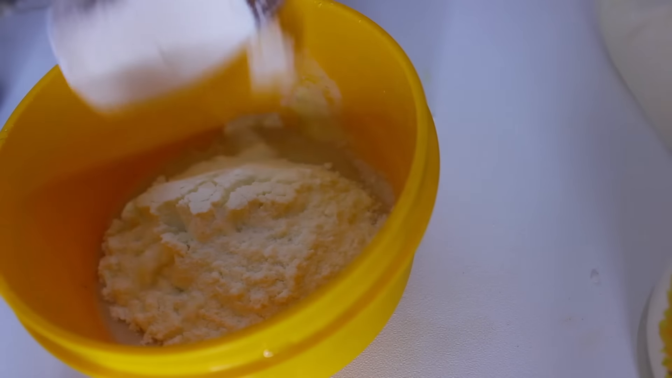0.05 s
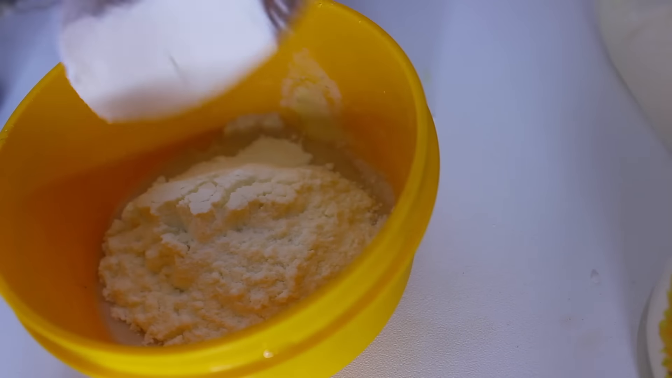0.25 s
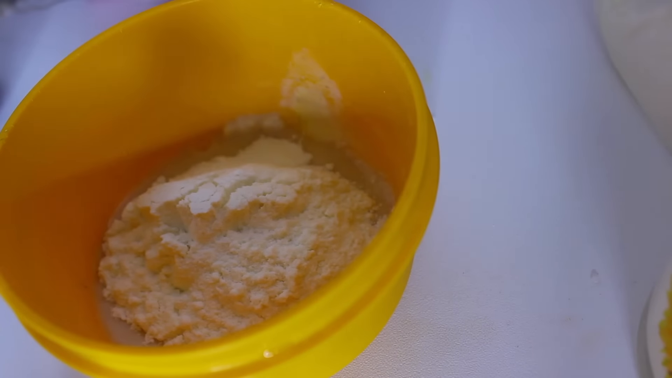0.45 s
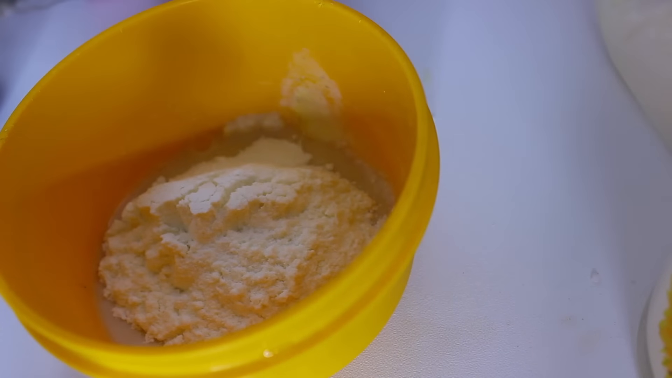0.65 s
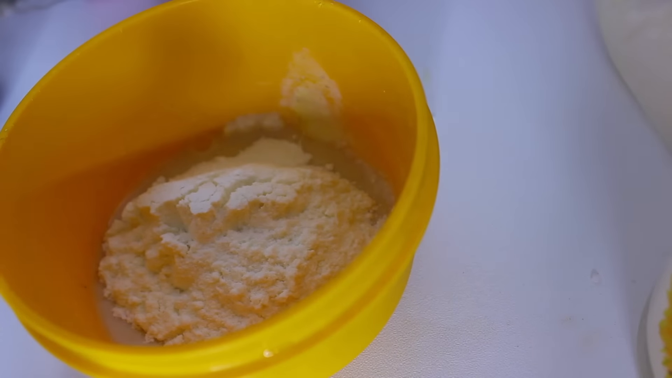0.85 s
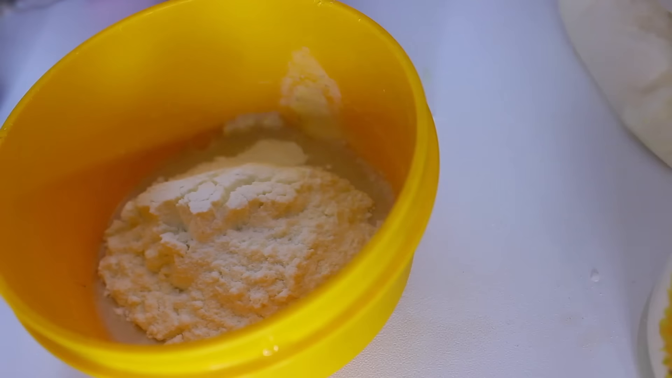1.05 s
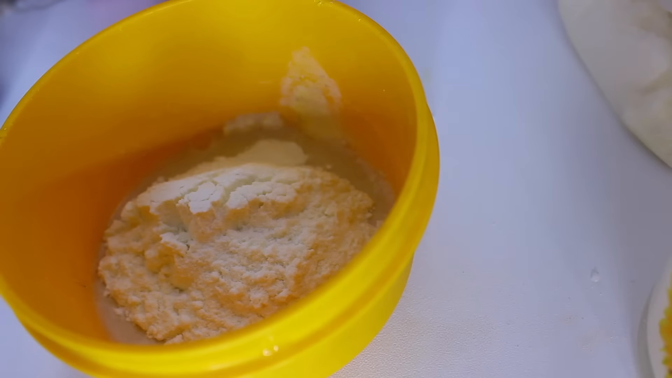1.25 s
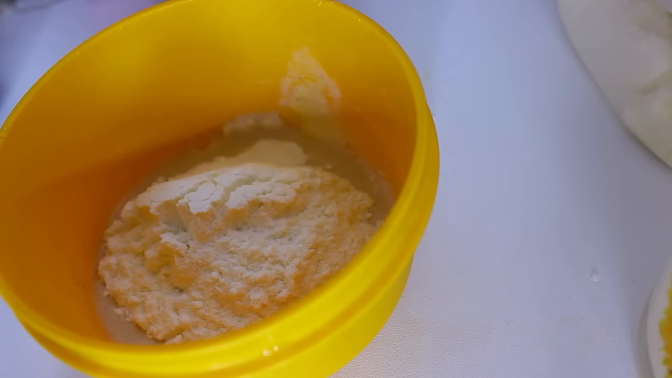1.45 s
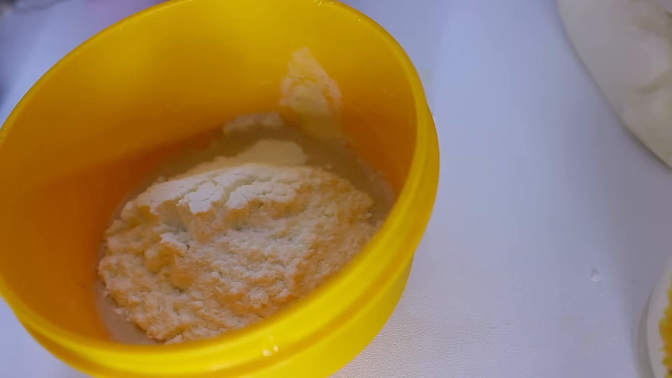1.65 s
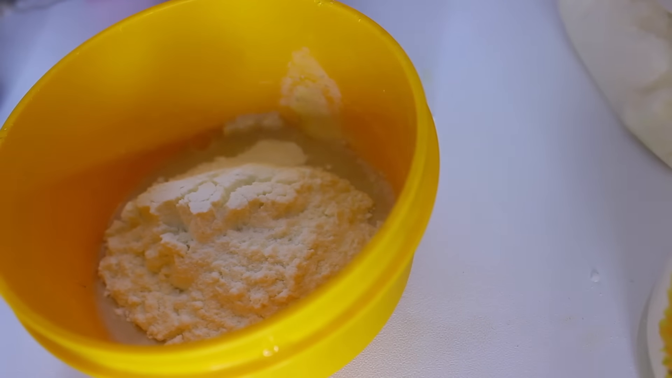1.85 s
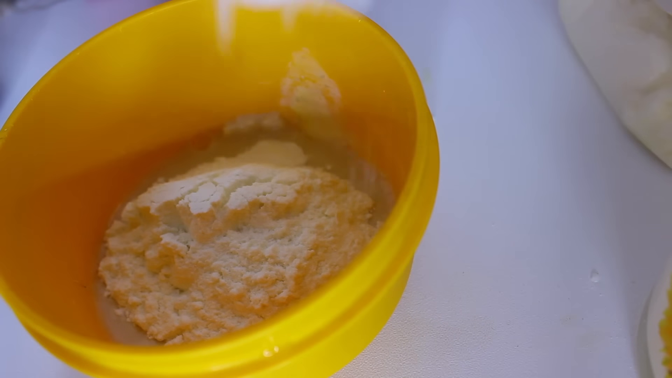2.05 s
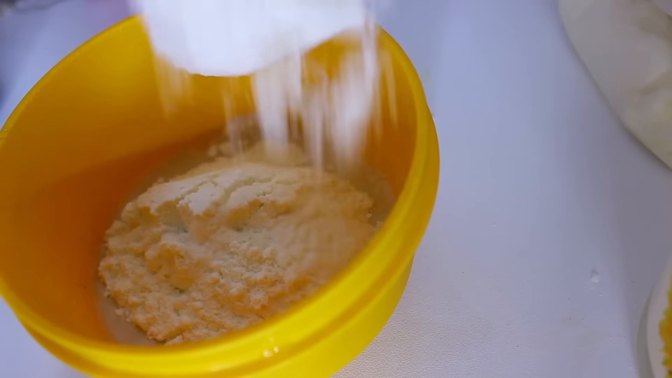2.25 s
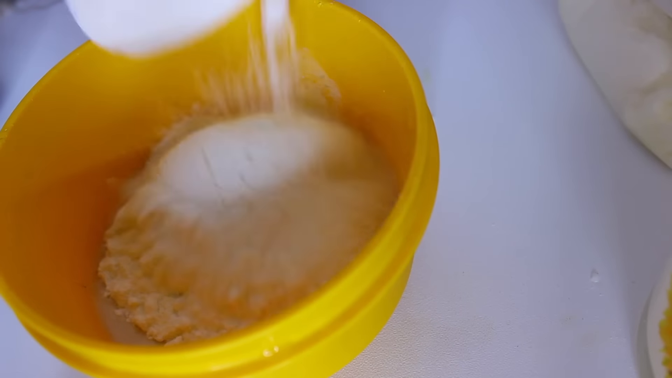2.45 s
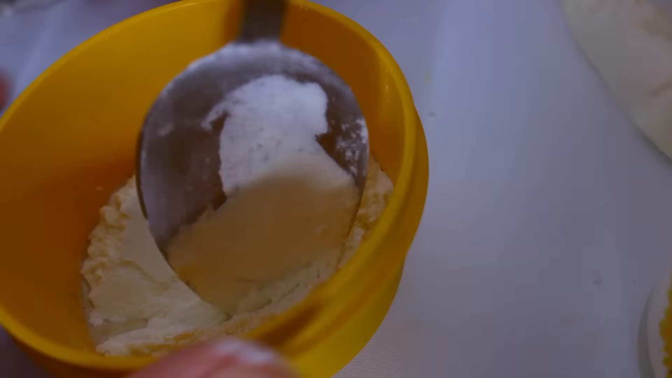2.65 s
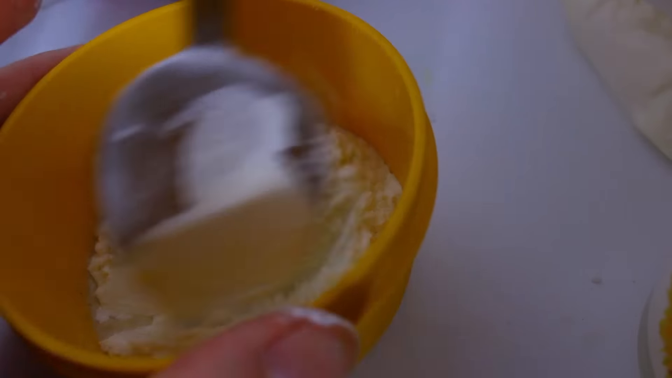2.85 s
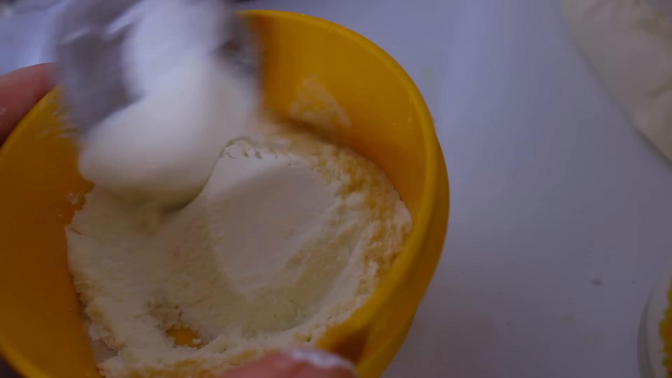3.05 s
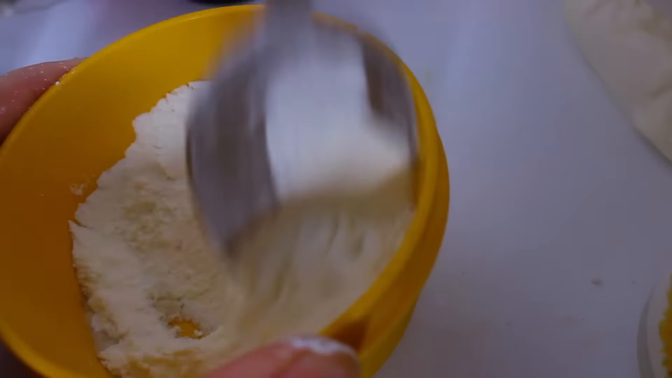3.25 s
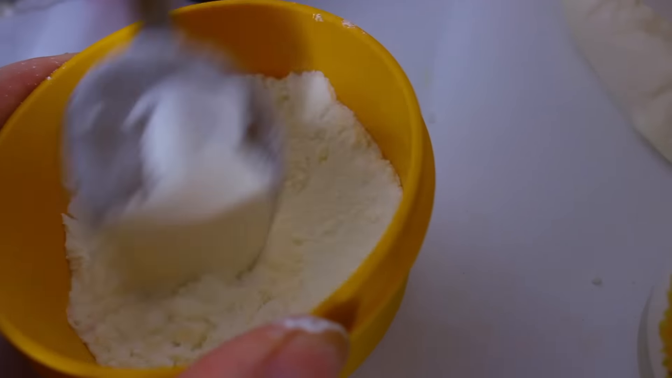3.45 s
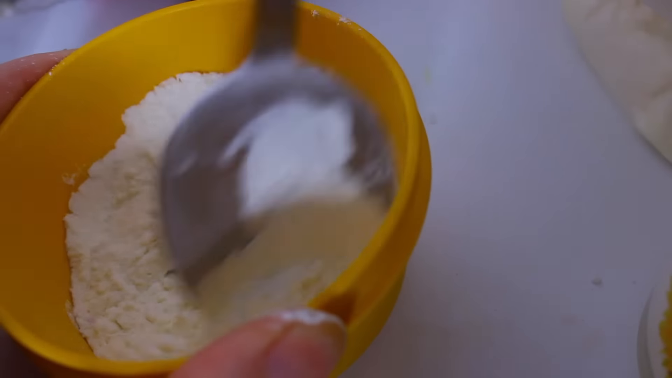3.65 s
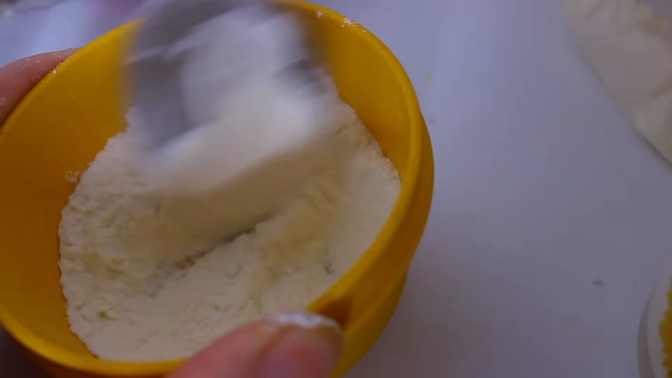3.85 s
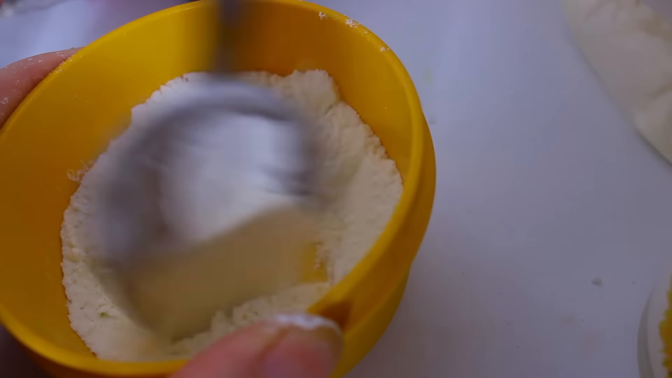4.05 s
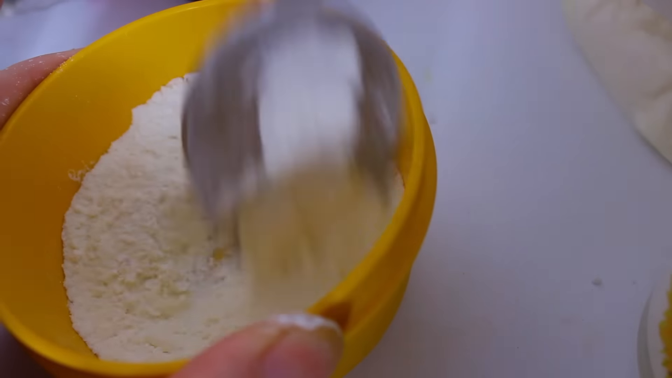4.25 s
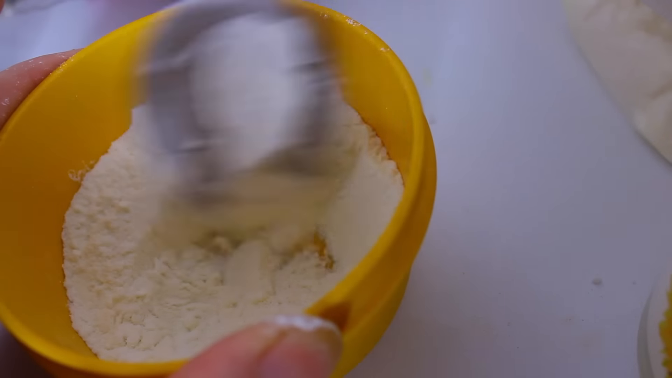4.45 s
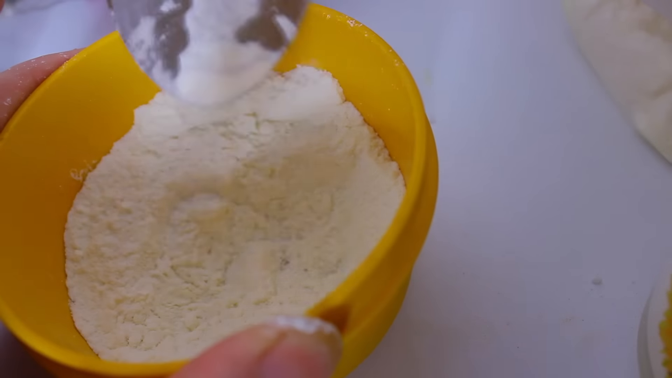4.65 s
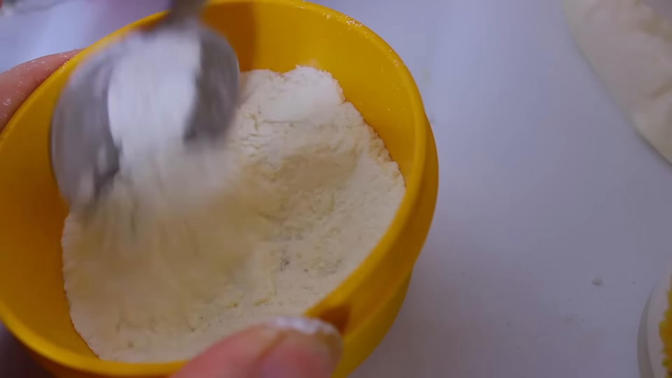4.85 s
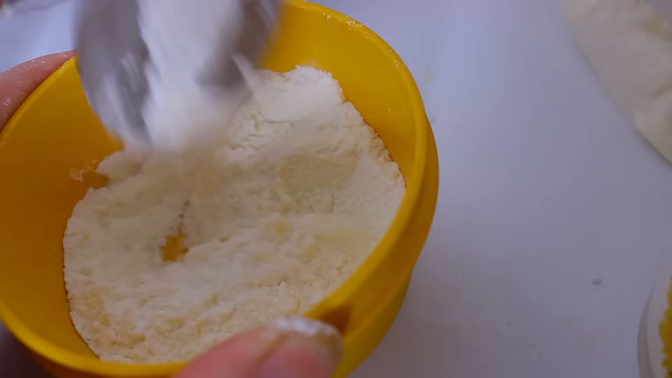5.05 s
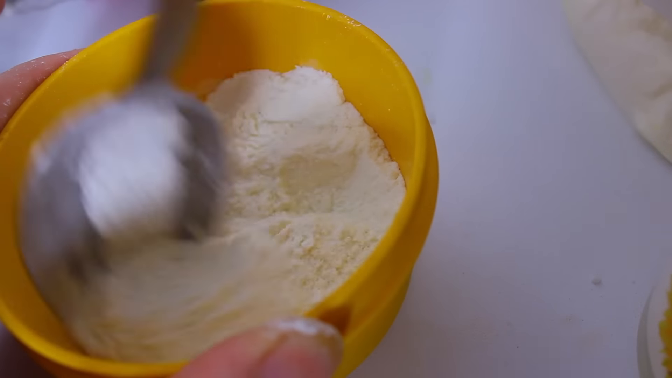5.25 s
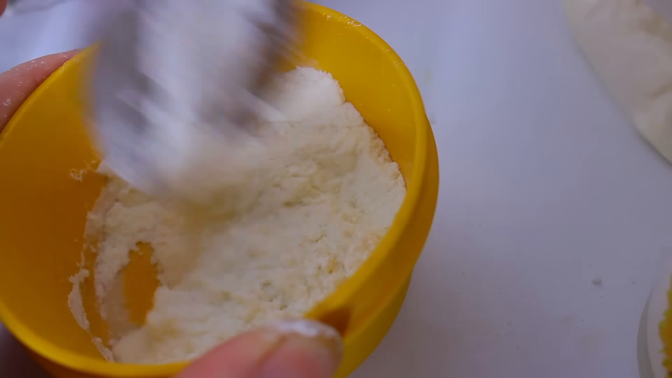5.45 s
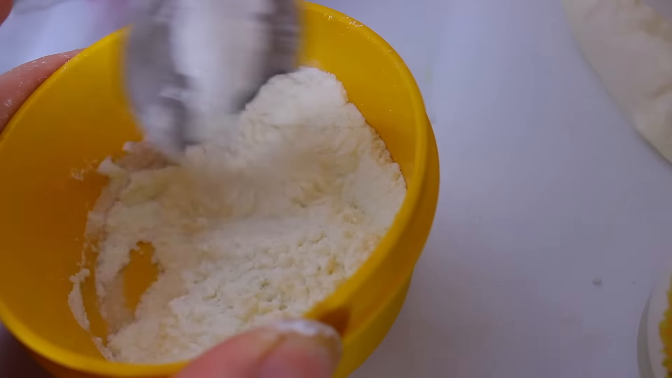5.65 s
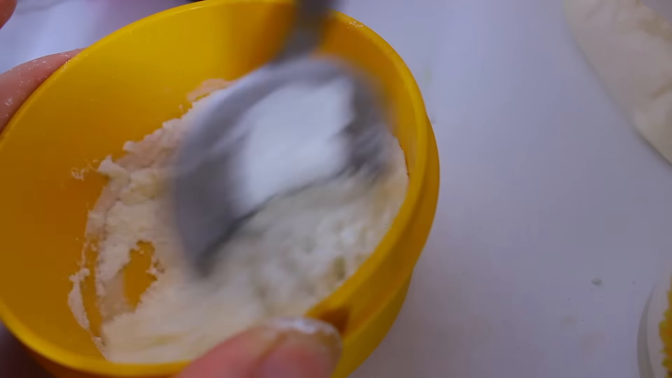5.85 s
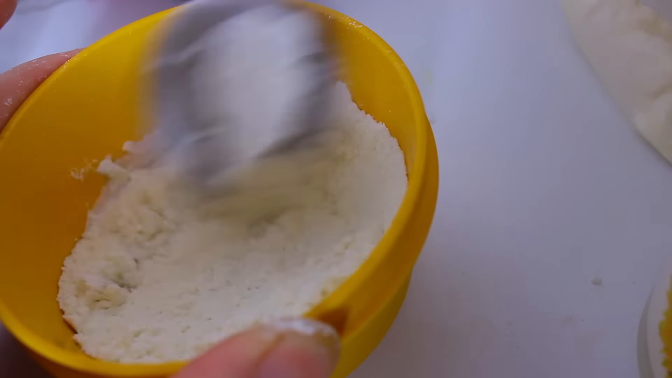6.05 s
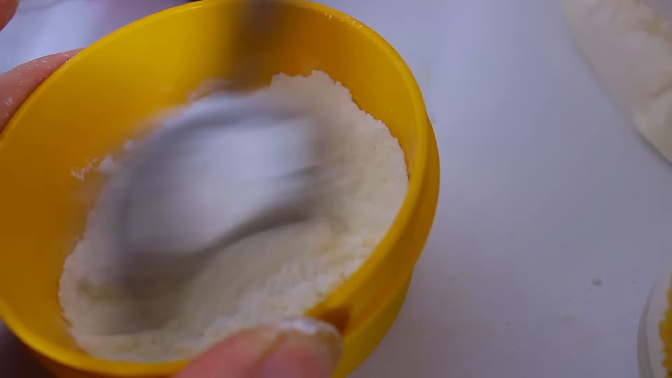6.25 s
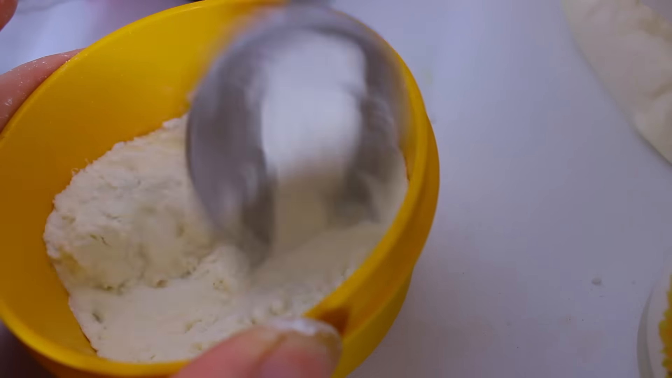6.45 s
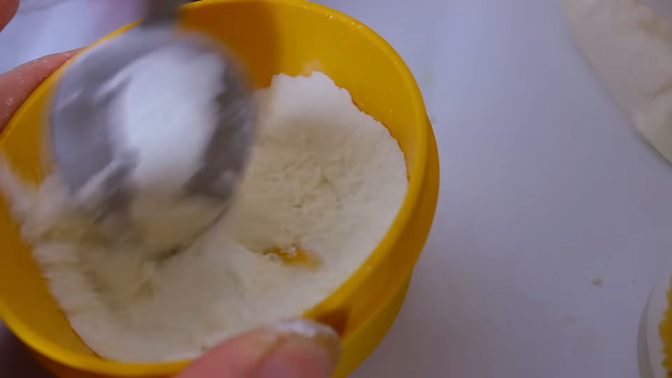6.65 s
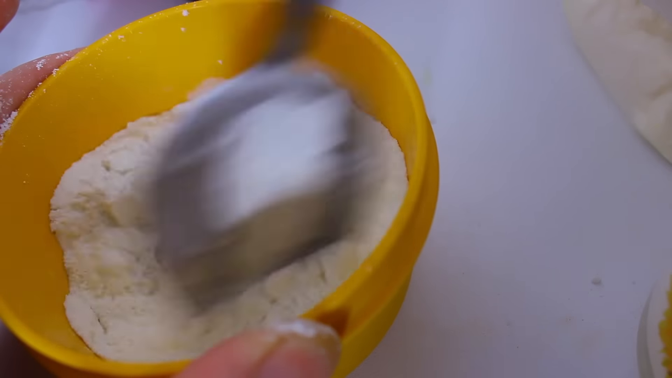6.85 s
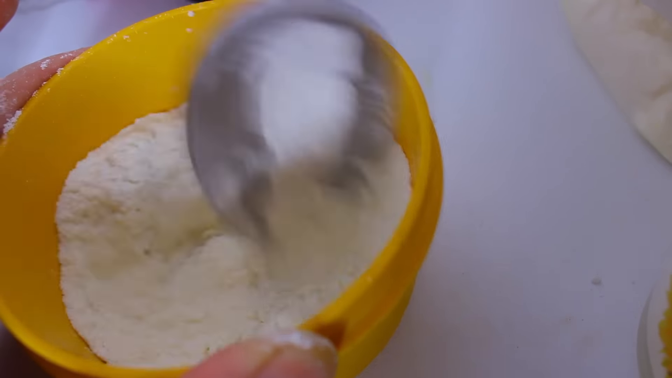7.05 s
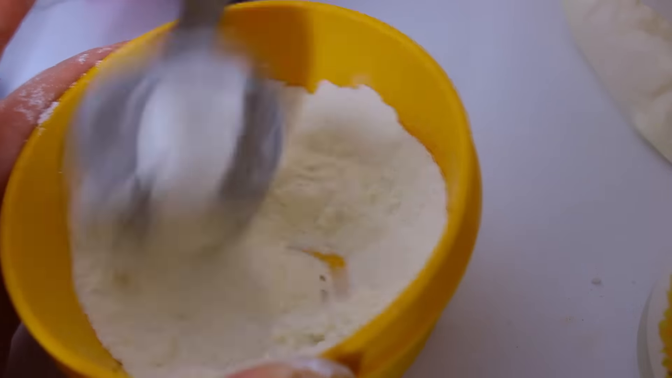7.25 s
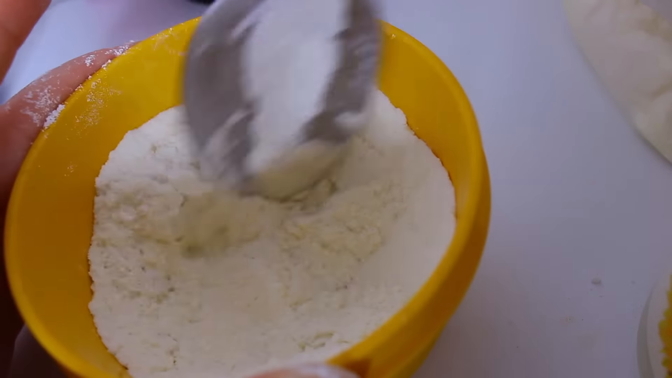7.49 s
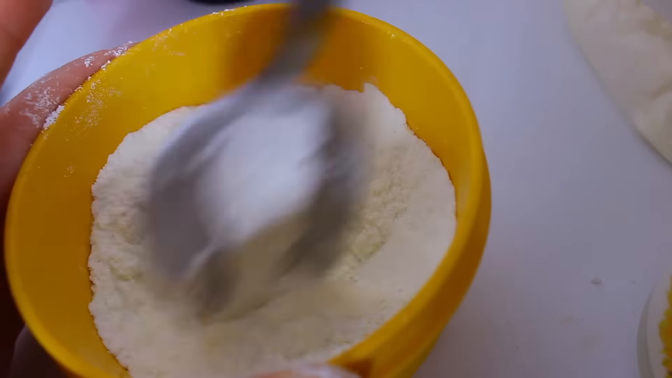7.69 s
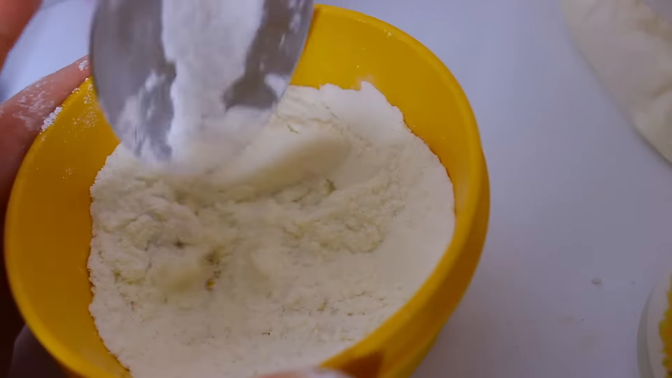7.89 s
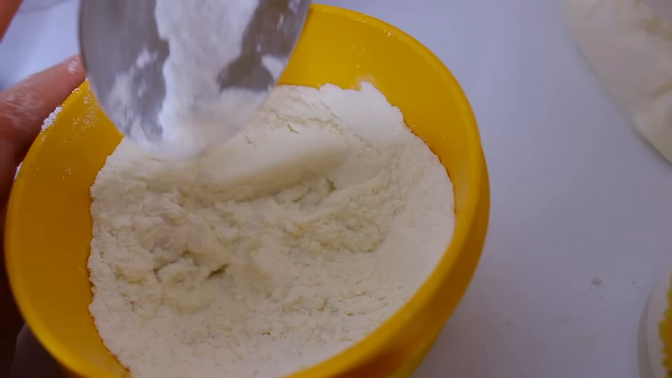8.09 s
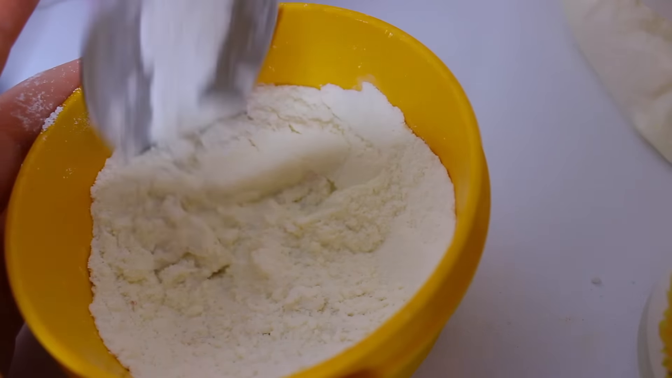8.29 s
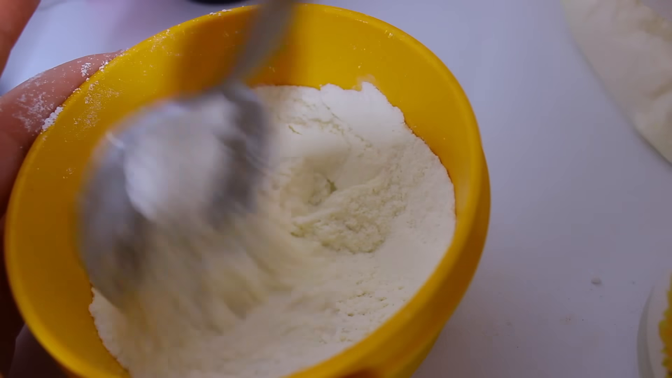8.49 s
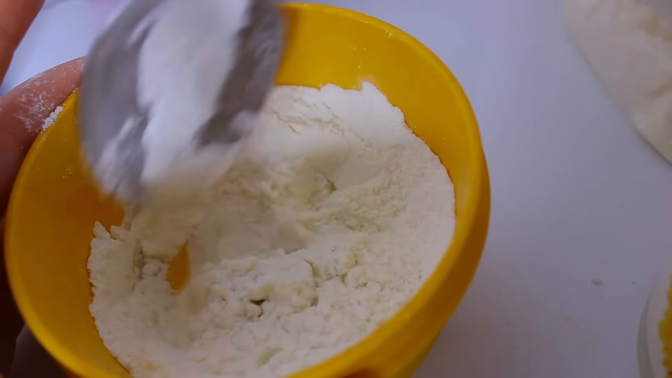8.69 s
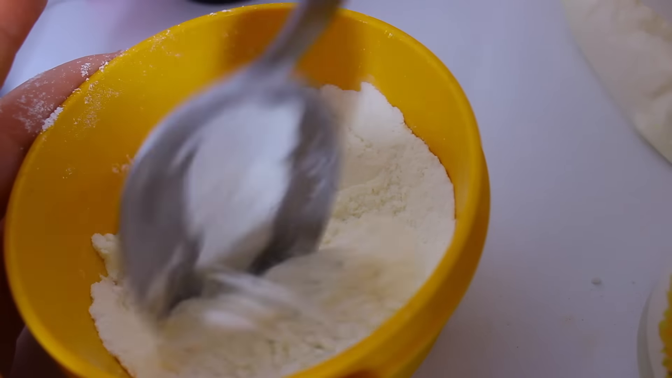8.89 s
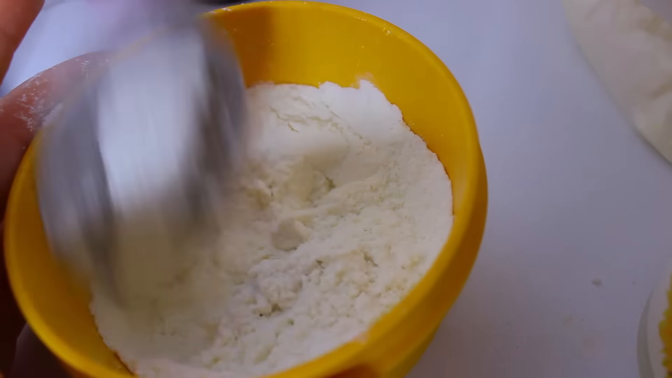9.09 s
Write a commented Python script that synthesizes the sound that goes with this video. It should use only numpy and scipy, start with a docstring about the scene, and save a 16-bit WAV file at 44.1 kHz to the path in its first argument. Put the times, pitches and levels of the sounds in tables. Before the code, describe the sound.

After a few light taps, a metal spoon knocks and scrapes around a plastic bowl of flour, close up in a kitchen.

```python
"""Stirring flour in a plastic bowl

After some quiet handling, a steel spoon stirs dry flour in a small hand-held bowl, close up.
It knocks on the wall and bottom, drags gritty powder along the plastic, catches and slips,
and the steel rings faintly along. The kitchen adds a short tail, over soft hiss and mains hum."""
import sys
import numpy as np
from scipy import signal
from scipy.fft import rfft, irfft, next_fast_len
from scipy.io import wavfile

SR = 44100
rng = np.random.default_rng(int(sys.argv[2]) if len(sys.argv) > 2 else 0)


def put_to_file(sound):
    """Save the sound as 16-bit audio at rate SR, in the file named by the first command-line argument."""
    columns = np.atleast_2d(sound).T  # one column per channel
    safe = np.clip(columns, -1, 1)
    whole_steps = np.round(safe * 32767)
    wavfile.write(sys.argv[1], SR, whole_steps.astype(np.int16))


N = 402633
TIME = np.arange(N) / SR

# knocks on the bowl, spoon blows and a few faint handling ticks: start_s, mid_db, treble_db (relative to mid),
# focus_hz (favoured pitch)
KNOCK_CUES = [(1.154, -47.5, -8, 746), (1.176, -61, 4, 1400), (1.2347, -48.5, -9.5, 910),
              (1.363, -42.5, 5, 1120), (1.855, -38, -38, 910), (2.406, -52.5, -9, 1200),
              (2.5397, -53.5, -2, 700), (3.1157, -36, 3.5, 1370), (3.1266, -46, -1, 1820),
              (3.2349, -33, -12.5, 490), (3.24, -21.5, -35, 930), (3.381, -41.5, -13, 630),
              (3.5575, -40.5, -28, 1600), (3.67, -22, -12.5, 1550), (4.0047, -22, -10, 1700),
              (4.3102, -21.5, -9, 1770), (4.5953, -20.5, -6, 1180), (4.7673, -35, -13, 625),
              (4.9073, -35, -18, 577), (5.2647, -28.5, -11.5, 416), (5.768, -33.5, -26, 1400),
              (6.188, -21, -6, 1350), (6.394, -29.5, -3.5, 850), (6.564, -21, -2, 1600),
              (7.0649, -31.5, -8, 2350), (7.1691, -26.5, -3.5, 1300), (7.4818, -22.5, -5, 1490),
              (7.718, -35, -13, 3000), (7.72, -43, -1, 270), (7.7341, -40.5, -9, 1300),
              (8.47, -50, -15, 800), (8.8624, -28, -4.5, 373)]


def undb(db):
    """Decibels to gain."""
    return 10 ** (np.asarray(db) / 20)


def unit(x):
    """Scale to rms 1."""
    return x / np.sqrt(np.mean(x ** 2))


def at_hz(points, hz):
    """Read (freq_hz, value) points on a log-frequency axis."""
    freq_hz, value = np.transpose(points)
    return np.interp(np.log(np.maximum(hz, 1)), np.log(freq_hz), value)


def colour(x, points):
    """EQ a sound with a (freq_hz, gain_db) curve."""
    size = next_fast_len(len(x))
    gain = undb(at_hz(points, np.fft.rfftfreq(size, 1 / SR)))
    return irfft(rfft(x, size) * gain, size)[:len(x)]


def band(x, lo_hz, hi_hz, order=2):
    """Causal band-pass."""
    sos = signal.butter(order, [lo_hz, min(hi_hz, SR / 2 - 1)], "band", fs=SR, output="sos")
    return signal.sosfilt(sos, x)


def wander(rate_hz):
    """Smooth random modulation, rms 1."""
    knots = rng.standard_normal(int(N / SR * rate_hz) + 2)
    return unit(np.interp(TIME * rate_hz, np.arange(len(knots)), knots))


def brighten(x, bright_db):
    """Balance the treble against the body below 5 kHz, at roughly constant power."""
    low, high = unit(band(x, 150, 5000)), unit(band(x, 5000, 19000))
    return (low - undb(bright_db) * high) / np.sqrt(1 + undb(2 * bright_db))


def room_tone():
    """Steady hiss, thin in the bass, with a faint rumble and a slightly wavering hum."""
    # tone of the hiss: freq_hz, gain_db
    hiss_eq = [(76, -32), (130, -9), (202, -6.5), (321, -12.5), (355, -8.5), (480, -7.5), (988, -9.5),
               (2210, -14), (2640, -11.5), (3570, -13), (15800, -22)]
    # hum lines: pitch_hz, level_db
    hum_lines = [(43, -81.5), (101, -72.5)]
    hiss = undb(-58.5) * unit(colour(rng.standard_normal(N), hiss_eq))
    rumble = undb(-73.5) * unit(band(rng.standard_normal(N), 67, 157))
    rumble += undb(-78.0) * unit(band(rng.standard_normal(N), 35, 38))
    waver = undb(1.2 * wander(5))
    hum = sum(undb(db) * np.sqrt(2) * np.sin(2 * np.pi * hz * TIME + 0.32 * wander(6))
              for hz, db in hum_lines)
    return hiss + rumble + waver * hum


def kitchen_tail(x, wet_db, gap_s):
    """A diffuse tail that builds after the first wall is reached and dies sooner in the treble."""
    # tone of the tail, with two low room resonances: freq_hz, gain_db
    tail_eq = [(80, -1), (170, 1.5), (197, 8), (220, 5.5), (246, 8), (280, -2.5), (420, -2), (600, -1.5),
               (1200, -5.5), (2500, -16.5), (5000, -8.5), (9000, -13), (15000, -14)]
    # decay of the room: freq_hz, t60_s
    decay_times = [(100, 0.68), (260, 0.41), (700, 0.59), (1800, 0.56), (5000, 0.43), (14000, 0.1)]
    t = np.arange(SR * 3 // 4) / SR
    edges_hz = np.geomspace(70, 17000, 13)
    tail = 0
    for lo, hi in zip(edges_hz, edges_hz[1:]):
        fade = np.exp(-np.log(1000) * t / at_hz(decay_times, np.sqrt(lo * hi)))
        tail = tail + band(rng.standard_normal(len(t)), lo, hi) * fade
    tail = colour(tail, tail_eq) * np.clip(t / gap_s - 1, 0, 1)
    return undb(wet_db) * signal.fftconvolve(x, tail)[:N] / np.sqrt(SR * .03)


def spoon_ring(x):
    """Every knock and scrape also feeds the narrow resonances of the steel."""
    # modes of the spoon: pitch_hz, t60_s, peak_gain_db
    steel_modes = [(1091, 0.37, 0.5), (1220, 0.67, -28), (1820, 1.6, -0.5), (4000, 1.2, 7), (7740, .6, -14)]
    t = np.arange(SR) / SR
    response = 0
    for hz, t60_s, db in steel_modes:
        decay = np.log(1000) / t60_s
        envelope = undb(db) * 2 * decay / SR * np.exp(-decay * t)
        response = response + envelope * np.sin(2 * np.pi * hz * t)
    return signal.fftconvolve(x, response)[:N]


def grit(per_s, spread_db):
    """Tiny clicks of powder grains giving way, unequal in size."""
    hit = rng.random(N) < per_s / SR
    return unit(hit * rng.standard_normal(N) * undb(spread_db * rng.standard_normal(N)))


def friction(judder_db, swell_db):
    """Grains stick and slip between spoon and wall; each resonance swells as the contact moves."""
    # resonances of the spoon's edge rubbing the wall: centre_hz, width_hz, gain_db
    rub_bands = [(1350, 410, 6.5), (1600, 112, 5), (2270, 340, 8.5), (2798, 390, 5.5), (3135, 650, 1.5),
                 (3835, 590, 2.5), (4160, 145, 0.5), (4435, 580, -1.5), (5300, 650, -4.5),
                 (6050, 460, -4.5), (7050, 1100, -9.5), (8700, 660, -11), (10270, 600, -12.5),
                 (12000, 2400, -18), (14700, 1900, -39)]
    force = grit(per_s=7900, spread_db=5.0) * undb(judder_db * wander(260))
    rasp = 0
    for hz, width, db in rub_bands:
        gain = undb(db + swell_db * wander(45))
        rasp = rasp + gain * band(force, max(hz - width / 2, 50), hz + width / 2)
    return unit(rasp)


def skids():
    """After each knock the spoon skids on through the flour, the louder the harder it struck."""
    lag_s, swell_s, fade_s, bright_db = 0.035, .025, 0.057, -15.5
    hard_knock_db, hard_skid_db = -21.5, -44
    return [(start_s + lag_s, swell_s, fade_s, hard_skid_db + 1.06 * (mid_db - hard_knock_db), bright_db)
            for start_s, mid_db, *_ in KNOCK_CUES]


def stir_envelopes():
    """Level and brightness in dB: each stroke swells and fades over the rustle of loose flour."""
    # loose flour shifting between the sweeps: time_s, level_db
    rustle_levels = [(0, -58), (.8, -60.5), (1.8, -61), (2.0, -58.5), (2.62, -58.5), (2.67, -53),
                     (3.5, -56.5), (4.0, -55), (5.0, -56), (5.55, -58.5), (5.9, -53), (7.6, -59),
                     (7.95, -61.5), (8.7, -60), (8.9, -53.5), (9.12, -57.5)]
    # sweeps of the spoon through the powder: peak_s, swell_s, fade_s, level_db, bright_db
    strokes = [(1.36, 0.011, .012, -47, -8), (2.09, .13, 0.072, -55.5, 1), (3.06, 0.052, 0.054, -45, -35),
               (3.36, 0.023, .025, -45.5, 2), (3.49, 0.082, .03, -49, -13), (3.735, .02, 0.018, -44.5, -2),
               (4.95, .012, 0.02, -48.5, -5), (5.26, 0.047, .06, -48.5, 2), (5.32, .02, 0.02, -40, -2.5),
               (5.67, 0.024, 0.024, -52.5, 12), (5.755, 0.019, 0.032, -42.5, 1),
               (5.89, 0.053, 0.038, -40, -4.5), (6.085, 0.055, 0.021, -42, -12),
               (6.26, 0.019, 0.02, -44.5, -3), (6.45, 0.012, 0.014, -40, -9),
               (6.49, 0.0072, 0.01, -32.5, -5), (6.54, 0.019, 0.021, -34.5, -10),
               (6.77, 0.013, 0.011, -44, -9), (6.888, 0.03, 0.022, -34.5, -1),
               (6.96, .03, 0.016, -45.5, 10), (7.147, .006, 0.022, -33.5, -5),
               (7.36, 0.17, .035, -47.5, -13.5), (7.72, 0.058, .04, -41, -3.5),
               (8.585, 0.062, 0.035, -45.5, 0.5), (8.92, 0.0099, 0.011, -43.5, 8)]
    rustle_bright_db = -1.5
    rustle_db = np.interp(TIME, *np.transpose(rustle_levels)) + wander(12)
    rustle_power = undb(2 * rustle_db)
    low = rustle_power / (1 + undb(2 * rustle_bright_db))
    high = rustle_power - low
    for peak_s, swell_s, fade_s, db, bright_db in strokes + skids():
        span = slice(*np.searchsorted(TIME, [peak_s - 3 * swell_s, peak_s + 3 * fade_s]))
        t = TIME[span] - peak_s
        bell_curve = np.exp(-.5 * (t / np.where(t < 0, swell_s, fade_s)) ** 2)
        power = (undb(db) * bell_curve) ** 2
        dull_share = 1 / (1 + undb(2 * bright_db))
        low[span] += power * dull_share
        high[span] += power * (1 - dull_share)
    return 10 * np.log10(low + high), 10 * np.log10(high / low)


def stirring(touch_db):
    """Light strokes only shift powder, a smooth hiss; above touch_db the spoon rasps on the wall."""
    # tone of flour sliding over itself: freq_hz, gain_db
    powder_eq = [(100, -6), (200, 3), (450, -0.5), (900, 4), (1800, 4), (3000, -2), (5000, -9),
                 (9000, -14.5), (16000, -12.5)]
    level_db, bright_db = stir_envelopes()
    contact = 1 / (1 + undb(2 * (touch_db - level_db)))
    rasp = brighten(friction(judder_db=2.4, swell_db=4), bright_db)
    powder = brighten(colour(grit(per_s=16000, spread_db=1.5), powder_eq), bright_db)
    return undb(level_db) * (np.sqrt(contact) * rasp + np.sqrt(1 - contact) * powder)


def slips():
    """The spoon's edge catches on the wall and lets go in a few milliseconds of friction."""
    # slips of the edge: peak_s, level_db
    slip_cues = [(3.55, -33), (5.307, -31.5), (5.329, -38), (5.766, -25.5), (5.799, -26.5), (5.918, -34),
                 (6.036, -36), (6.188, -20), (6.434, -23), (6.454, -29.5), (6.467, -29), (6.492, -26.5),
                 (6.529, -25), (6.553, -24.5), (6.839, -37), (7.137, -26.5), (7.158, -26), (7.21, -20.5),
                 (7.625, -35.5)]
    bursts = np.zeros(N)
    for peak_s, db in slip_cues:
        span = slice(int((peak_s - .02) * SR), int((peak_s + .02) * SR))
        bursts[span] += undb(db) * np.exp(-((TIME[span] - peak_s) / 0.003) ** 2)
    return bursts * friction(judder_db=5.5, swell_db=1.3)


def struck_modes(focus_hz, falloff_db_per_octave, scatter_db, detune):
    """The bowl's modes for one point of contact: weaker away from focus_hz, all varying a little."""
    # the plastic bowl, damped by flour and hand: pitch_hz, width_hz, gain_db
    bowl_modes = [(181, 41, -16), (242, 17, -8.5), (292, 59, -1), (371.5, 14, 0.5), (430, 43, -3.5),
                  (556.6, 60, -4.5), (664, 84, -4.5), (799, 12.3, -3.5), (897, 29, -4), (1058, 113, -6),
                  (1170, 92, -1), (1426, 225, -3.5), (1753, 85, 1), (2116, 113, -1.5), (2376, 130, 1),
                  (2810, 66, -1), (3163, 180, 6.5), (3810, 250, -27), (4380, 190, -11), (4760, 180, -11.5),
                  (5290, 620, -7.5), (6360, 150, -24), (7560, 180, -31), (8900, 260, -14), (9600, 240, -40),
                  (12900, 660, -17)]
    hz, width, db = np.transpose(bowl_modes)
    pitch_jitter, gain_jitter = rng.standard_normal((2, len(hz)))
    octaves_away = np.abs(np.log2(hz / focus_hz))
    gain_db = db - falloff_db_per_octave * octaves_away + scatter_db * gain_jitter
    return np.stack([hz * (1 + detune * pitch_jitter), width, gain_db], axis=1)


def ring(modes, t):
    """Struck (pitch_hz, width_hz, gain_db) modes ring out; the wider ones die sooner."""
    hz, width, db = np.transpose(modes)[:, :, None]
    return np.sum(width * undb(db) * np.exp(-np.pi * width * t) * np.cos(2 * np.pi * hz * t), axis=0)


def disperse(x, lag_ms):
    """Bending waves in the wall: the treble arrives first, 1 kHz after lag_ms, the bass later still."""
    khz = np.fft.rfftfreq(len(x), 1 / SR) / 1000
    return irfft(rfft(x) * np.exp(-4j * np.pi * lag_ms * np.sqrt(khz)), len(x))


def knock(mid_db, treble_db, focus_hz):
    """One blow: flour cushions it to a hollow thud, bare steel on plastic adds a crack."""
    even_hz, bass_db_per_octave, max_bass_db = 800, 9.5, 4.5
    t = np.arange(SR // 2) / SR
    modes = struck_modes(focus_hz, falloff_db_per_octave=9.0, scatter_db=3.0, detune=0.019)
    register = np.digitize(modes[:, 0], [750, 3500])
    bass, mid, treble = (unit(ring(modes[register == k], t)) for k in range(3))
    crack = unit(band(rng.standard_normal(len(t)), 2000, 3800, order=1) * np.exp(-t / 0.0038))
    # soft, low points of contact thud and stiff, high ones clack; bass equals mid at even_hz
    bass_db = min(bass_db_per_octave * np.log2(even_hz / focus_hz), max_bass_db)
    bass = undb(bass_db) * unit(band(bass, np.clip(0.36 * focus_hz, 110, 300), 965))
    mid = unit(band(mid, 590, 2400, order=1))
    treble = undb(treble_db) * unit(band(treble + undb(-1) * crack, 2850, 11900))
    attack_gain = np.sqrt(0.015 / t[-1])  # levels are roughly the rms of the first 20 ms
    return undb(mid_db) * disperse(bass + mid + treble, lag_ms=0.679) * attack_gain


def knocks():
    """The spoon strikes the wall and bottom of the bowl, with a few faint handling ticks among the blows, each
    on its cue."""
    track = np.zeros(N + SR)
    for start_s, mid_db, treble_db, focus_hz in KNOCK_CUES:
        blow = knock(mid_db, treble_db, focus_hz)
        start = int(start_s * SR)
        track[start:start + len(blow)] += blow
    return track[:N]


def scene():
    """Spoon and bowl close by, the kitchen around them, in mono."""
    bowl = knocks() + stirring(touch_db=-47) + slips()
    close = bowl + spoon_ring(bowl)
    return (close + kitchen_tail(close, wet_db=-5.0, gap_s=0.0033) + room_tone())[None]


def record(dry):
    """A steep low-pass trims the very top."""
    cutoff_hz = 15900
    return signal.sosfilt(signal.ellip(10, .2, 70, cutoff_hz, fs=SR, output="sos"), dry)


dry = scene()
out = record(dry)
put_to_file(out)
```